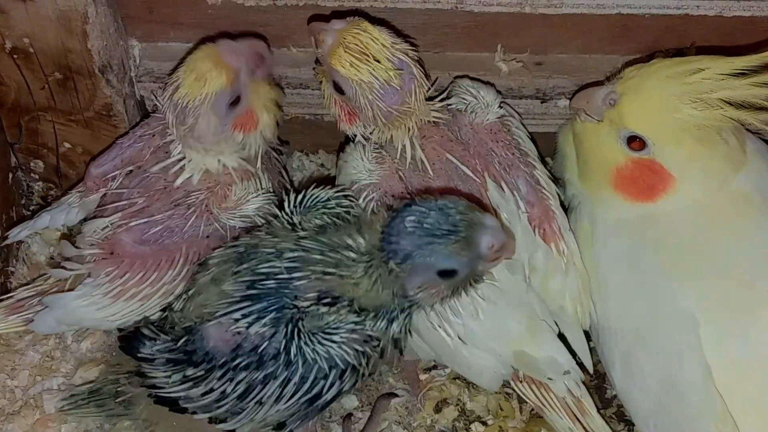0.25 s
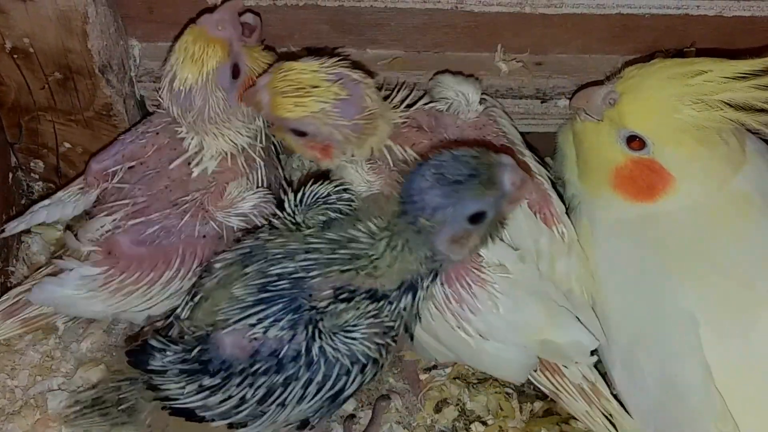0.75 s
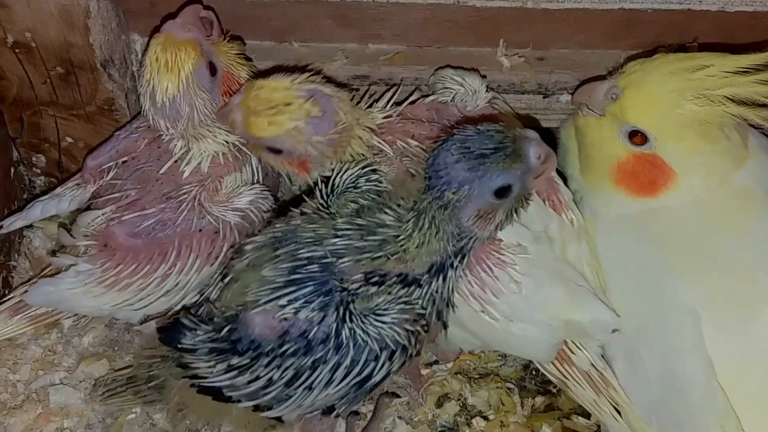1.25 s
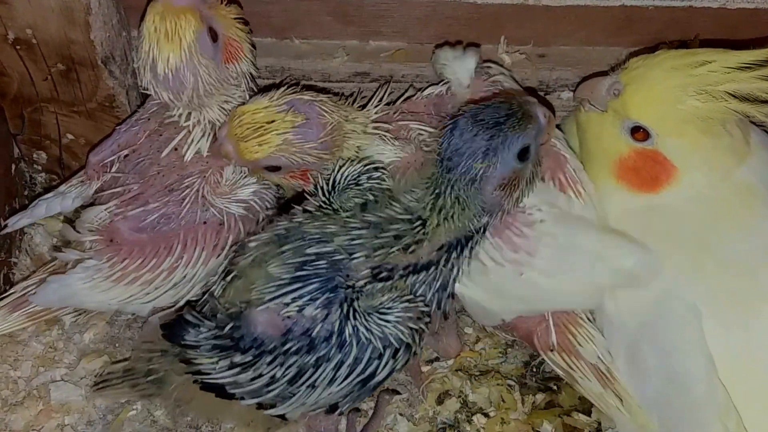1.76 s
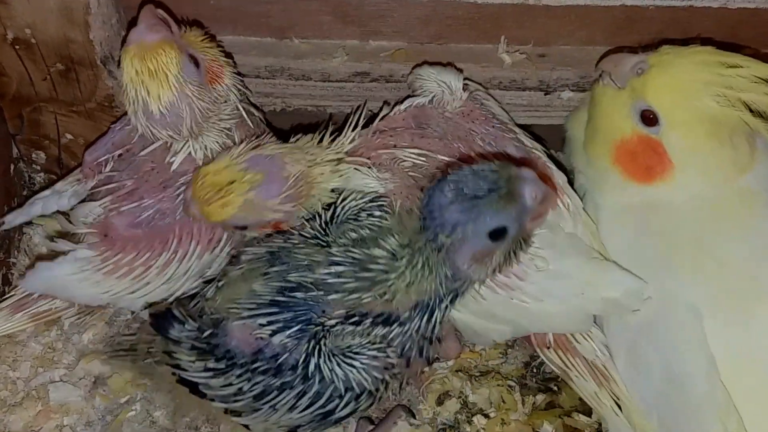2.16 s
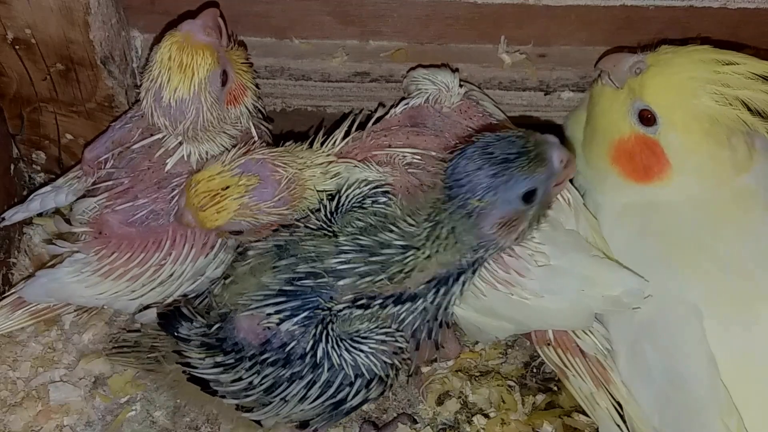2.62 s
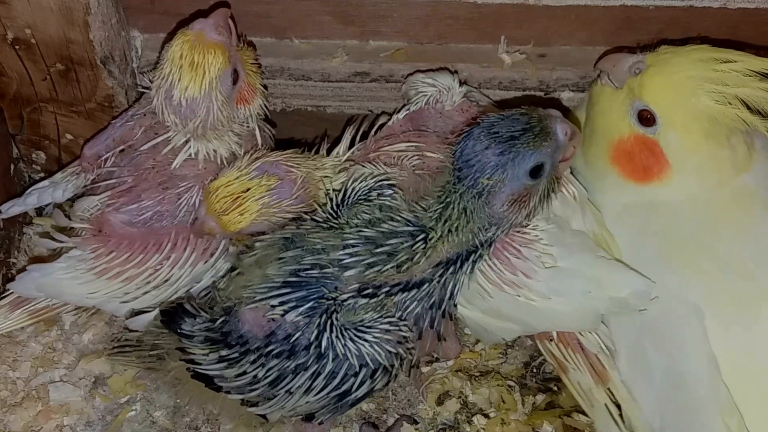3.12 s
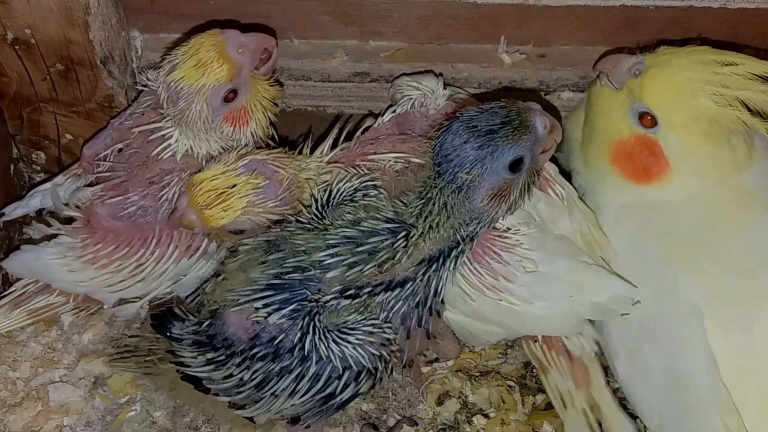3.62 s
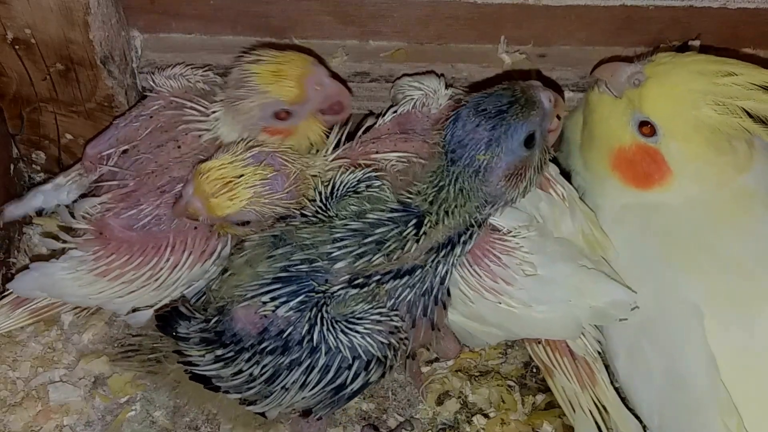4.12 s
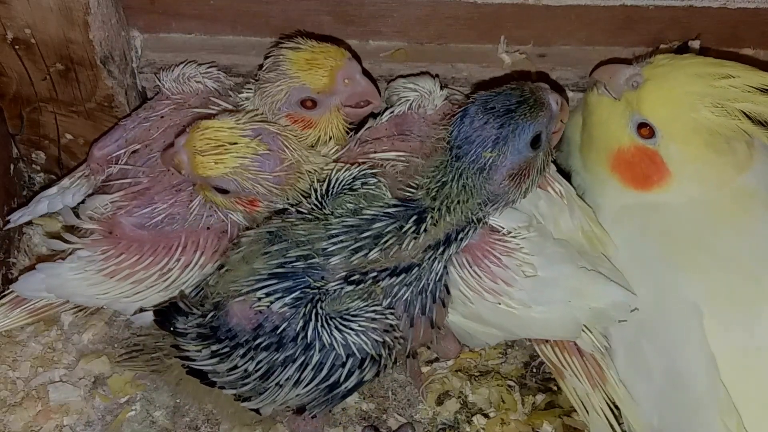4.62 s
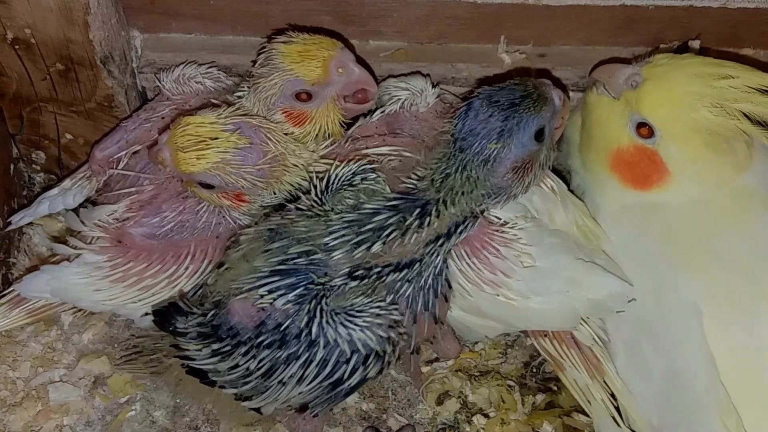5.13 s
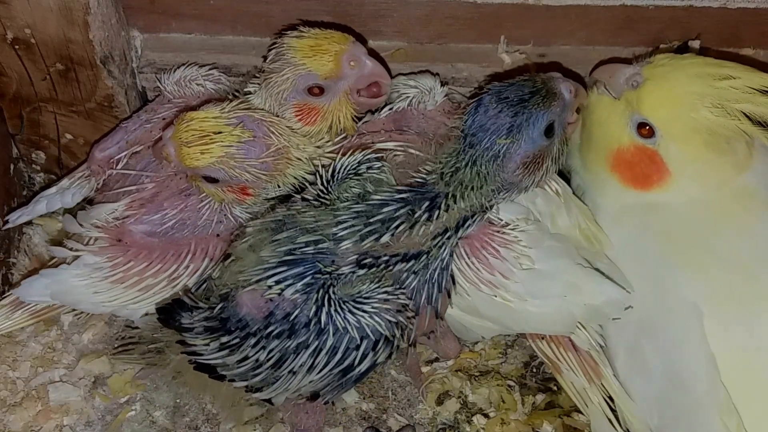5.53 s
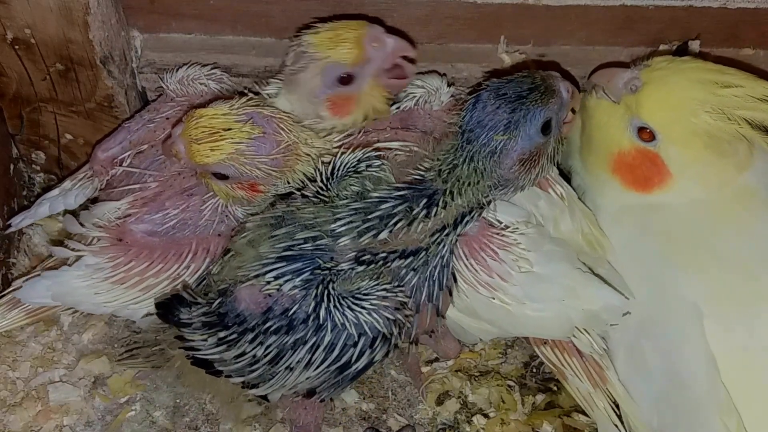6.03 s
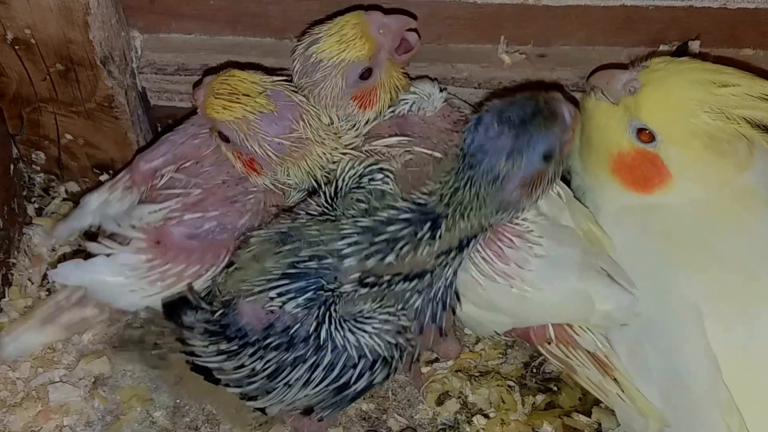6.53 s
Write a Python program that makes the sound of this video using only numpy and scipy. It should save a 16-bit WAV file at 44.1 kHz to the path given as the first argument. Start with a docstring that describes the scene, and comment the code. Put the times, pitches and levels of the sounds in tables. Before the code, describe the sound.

Cockatiel chicks beg in a wooden nest box, miked closely, with a tight brief echo and a faint steady room murmur. From 0.1 seconds, croaks and sputtering rasps break out with cracking squeals and a thin falling whistle, until about 1.2; low thuds hit the boards near 0.9 and 1.1. After a short lull, a stronger bout starts at 1.46: whistles, bright pips around 1.6 to 1.7, then long rasps and airy hisses to 2.2. A soft knock at 2.3 precedes a sharp rising peep at 2.5, squeals, hiss and a trembling whistle until 3.3. Rasps and croaks return at 3.4, with piercing squeals near 4.0 and a whistle sinking to 4.5. From 4.6, rasping and swelling hiss lead into squeals at 5.05 to 5.4, then wavering whistles. A bump at 5.95 opens another hissing, rasping, squealing bout; a knock and rising whistle finish 6.5 to 6.8.

```python
"""Cockatiel chicks beg in a wooden nest box, close to the microphone.
Their calls are ragged pulse trains: rasps ring the throat resonances, hisses those of the open beak.
Croaks are single hard slaps of the syrinx. Thin gliding whistles, cracking squeals, pure pips and
slurred peeps are swept tones with overtones. Filtered-noise bumps on the wood and a quiet room complete it."""
import sys
import numpy as np
from scipy import signal
from scipy.fft import rfft, irfft
from scipy.io import wavfile

SR = 44100
rng = np.random.default_rng(int(sys.argv[2]) if len(sys.argv) > 2 else 0)


def materialize(psi):
    """Save the field psi as 16-bit PCM at rate SR to the path in sys.argv[1].

    A 1-D psi becomes a single channel; in a 2-D psi each row is a channel.
    """
    bounded = np.clip(np.atleast_2d(psi).T, -1, 1)
    quanta = np.round(bounded * 32767).astype(np.int16)
    wavfile.write(sys.argv[1], SR, quanta)


N = 298557
TIME = np.arange(N) / SR

# throat and box resonances under rasps and croaks: (centre [Hz], width [Hz], relative level [dB])
THROAT_MODES = [(759, 45.7, -2), (1013, 68, -4), (1276, 44, -8), (1455.3, 56.3, 3), (1830, 145, -10),
                (1986, 36, -6), (2688, 150, -13.5), (3007, 84, -11), (3720, 110, -16), (4310, 140, -18.5),
                (5260, 380, -26.5), (6540, 270, -28.5), (9860, 790, -39)]


def amp(db):
    """Decibels to gain."""
    return 10 ** (np.asarray(db) / 20)


def unit(x):
    """Scales to rms 1."""
    return x / np.sqrt(np.mean(x ** 2) + 1e-20)


def add(mix, start_s, sound):
    """Mixes a sound in at start_s."""
    part = mix[max(round(start_s * SR), 0):][:len(sound)]
    part += sound[:len(part)]


def wander(rate_hz):
    """Smooth random signal of rms 1: noise rolled off above rate_hz."""
    hz = np.fft.rfftfreq(N, 1 / SR)
    rolloff = np.sqrt(1 + (hz / rate_hz) ** 6)
    return unit(irfft(rfft(rng.standard_normal(N)) / rolloff, N))


def play(start_s, length_s, db, swell_db, attack_s, release_s):
    """One call: its sample indices, its progress 0 to 1, and a loudness that rises, swells or sags, and stops."""
    after_start = TIME > start_s - attack_s / 2
    before_end = TIME < start_s + length_s + release_s / 2
    at = np.flatnonzero(after_start & before_end)
    t = TIME[at] - start_s
    u = np.clip(t / length_s, 0, 1)
    gate = np.clip(np.minimum(t / attack_s, (length_s - t) / release_s) + .5, 0, 1)
    return at, u, np.sin(np.pi / 2 * gate) ** 2 * amp(db + swell_db * (u - .5))


def effort(calls, attack_s, release_s):
    """Loudness of a run of calls over the whole scene."""
    out = np.zeros(N)
    for call in calls:
        at, _, loudness = play(*call, attack_s, release_s)
        out[at] += loudness
    return out


def ring(x, modes, size=4096):
    """Minimum-phase filter with these resonances and dark valleys between them."""
    hz = np.fft.fftfreq(size, 1 / SR)
    power = sum(amp(db) ** 2 / (1 + ((abs(hz) - f) / width) ** 2) ** 1.6 for f, width, db in modes)
    log_gain = np.log(power + 1e-10) / 2
    taps = np.fft.ifft(np.exp(np.conj(signal.hilbert(log_gain)))).real
    return signal.oaconvolve(x, taps[:size // 2])[:N]


def build_up(x):
    """The box takes a few milliseconds to answer a slap: all-passes delay each band, its level unchanged."""
    # (centre [Hz], width [Hz])
    late_bands = [(800, 450), (1460, 420), (3000, 1000), (4400, 1200)]
    for hz, width in late_bands:
        x = x - 2 * signal.lfilter(*signal.iirpeak(hz, hz / width, fs=SR), x)
    return x


def rattle(rate_hz, jitter, spread_db, puff_s, air):
    """Uneven slaps of the syrinx, each followed by a short decaying puff of turbulent air."""
    turns = np.cumsum(rate_hz * np.exp(jitter * wander(rate_hz))) / SR
    slaps = np.diff(np.floor(turns), prepend=0) * amp(spread_db * rng.uniform(-1, 1, N))
    flow = signal.lfilter([1], [1, -np.exp(-1 / (puff_s * SR))], slaps)
    turbulence = unit(flow * rng.standard_normal(N))
    return unit(unit(slaps) + air * turbulence)


def shrill(hz, octave_db):
    """High sine of rms 1 with faint overtones."""
    phase = 2 * np.pi * np.cumsum(hz) / SR
    octave = amp(octave_db) / (1 + (hz / 3500) ** 12)  # the beak passes little above 7 kHz
    overtones = (octave + amp(-35.5)) * np.sin(2 * phase) + amp(-40.5) * np.sin(3 * phase)
    return np.sqrt(2) * (np.sin(phase) + overtones)


def squeaks(hz, spread):
    """Chance scraps of tone, a few milliseconds each, scattered about hz."""
    catch = np.clip(wander(rate_hz=55) - .7, 0, 1)
    return unit(catch * shrill(hz * np.exp(spread * wander(rate_hz=35)), octave_db=-24))


def rasps():
    """The rattle rings the throat in sputtering bursts, evener when pushed, and chokes off in brief catches."""
    # (start [s], length [s], relative level [dB], lowest throat resonance against the rest [dB])
    rasp_calls = [(0.203, 0.057, -44, -7.5), (0.292, 0.152, -45.5, 1), (.456, 0.032, -45, -1),
                  (0.511, 0.042, -43, -5), (0.568, 0.026, -48, 2.5), (0.644, 0.12, -46.5, -5),
                  (0.778, 0.084, -45.5, -5), (0.886, 0.05, -44.5, 2), (0.95, 0.064, -44.5, 2),
                  (1.028, 0.13, -46, 8), (1.472, .018, -48, -12), (1.516, .033, -46.5, -7),
                  (1.57, 0.12, -44.5, -2.5), (1.708, 0.17, -45.5, 4), (1.886, 0.22, -45.5, 8),
                  (2.099, 0.068, -47.5, -2.5), (2.65, 0.089, -56.5, -2.5), (2.737, 0.34, -71, 19),
                  (3.443, 0.032, -47, -1), (3.51, 0.07, -44.5, -1.5), (3.606, 0.07, -46.5, 3.5),
                  (3.68, 0.22, -46.5, 5.5), (3.866, 0.059, -49.5, 0), (4.008, 0.029, -47, -11),
                  (4.05, 0.038, -50.5, -31), (4.645, 0.035, -46, -8), (4.693, 0.08, -46.5, -4),
                  (4.776, 0.024, -45.5, 2), (4.808, 0.24, -47.5, 0), (5.06, 0.036, -57, 4.5),
                  (5.106, 0.063, -50.5, -1), (5.172, 0.18, -50, -2), (5.592, 0.075, -53.5, -14),
                  (5.843, 0.038, -53, -8), (5.897, .07, -49.5, -6), (5.981, 0.16, -49.5, 5.5),
                  (6.141, 0.32, -48, 5), (6.443, 0.06, -51.5, 2)]
    # catches that choke a rasp: (centre [s])
    catch_times = [.234, 0.477, 0.702, .735, 1.607, 1.626, 1.795, 2.137, 3.566, 4.893, 4.917, 6.279, 6.405]
    catch_s, catch_depth = 0.01, 0.89
    sag_db = 1.5
    start, length, level_db, depth_db = np.transpose(rasp_calls)
    calls = [(s, span, db, -sag_db) for s, span, db in zip(start, length, level_db)]
    push = effort(calls, attack_s=.003, release_s=.012)
    depth = amp(np.interp(TIME, start + length / 2, depth_db))
    sputter_db = 8.5 * np.clip(1 - push / amp(-39), .42, 1)
    bursts = amp(sputter_db * (np.tanh(2 * wander(rate_hz=130) + .5) - .6))

    choke = np.zeros(N)
    for s in catch_times:
        add(choke, s - catch_s / 2, np.hanning(round(catch_s * SR)))
    push = push * np.clip(1 - catch_depth * choke, 0, 1)

    drive = push * bursts * rattle(rate_hz=230, jitter=.35, spread_db=3, puff_s=.0012, air=.35)
    noise_gain = np.std(ring(rng.standard_normal(N), THROAT_MODES))
    voice = build_up(ring(drive, THROAT_MODES)) / noise_gain
    low = signal.sosfiltfilt(signal.butter(3, 1120, fs=SR, output="sos"), voice)
    voice = voice + low * (depth - 1)
    return amp(.4) * voice + amp(-13) * push * squeaks(hz=3030, spread=.04)


def croaks():
    """One hard slap of the syrinx: the main throat resonance swells and dies within some cycles."""
    # alone or inside a rasp: (start [s], level [dB])
    slaps = [(0.106, -36), (0.156, -41), (0.22, -39), (.303, -42), (0.388, -33), (.479, -35.5), (.515, -37),
             (.961, -35), (1.036, -36.5), (1.465, -37), (1.717, -46), (3.606, -39), (3.685, -38),
             (3.75, -35), (3.869, -35.5), (3.897, -47), (4.546, -52), (4.795, -42.5), (4.854, -42),
             (4.877, -40), (4.98, -45), (5.16, -42), (6.551, -41.5), (6.651, -47)]
    tone_hz, rise_s, noise = 1500, 0.0015, 0.89
    out, t = np.zeros(N), np.arange(SR // 50) / SR
    swell = t / rise_s * np.exp(1 - t / rise_s)
    tone = np.sin(2 * np.pi * tone_hz * t)
    air = unit(ring(rng.standard_normal(N), THROAT_MODES))
    for s, db in slaps:
        puff = unit(air[round(s * SR):][:len(t)])
        add(out, s, amp(db) * swell * (tone + noise * puff) / (1 + noise))
    return out


def hisses():
    """A faster, airier rattle through the open beak, brighter the wider it gapes, with faint squeaks."""
    # (start [s], length [s], relative level [dB], swell start to end [dB], treble gain [dB])
    hiss_calls = [(0.707, 0.15, -53.5, 0, -6), (0.947, 0.25, -57, -2.5, 1.5), (1.54, 0.046, -63, 7, 18),
                  (1.949, 0.23, -53, 5, 0), (2.623, .17, -52, -2, 2), (2.818, 0.25, -50, 5.5, 4),
                  (3.722, 0.22, -59.5, -7, 2.5), (4.003, 0.091, -48, 8, -18), (4.702, 0.375, -49, 12, 0),
                  (5.079, 0.28, -53, 4, -4.5), (5.954, 0.31, -46.5, -1, -4), (6.258, 0.28, -52.5, 4, -16)]
    # open-beak resonances: (centre [Hz], width [Hz], relative level [dB])
    beak_modes = [(2137, 100, -4.5), (2520, 58, -0.5), (2870, 41, -4.5), (3130, 56, 1), (3355, 95, 4.5),
                  (3510, 70, -7), (3730, 67, 0.5), (4100, 95, 0), (4406, 61, -0.5), (4780, 66, -1.5),
                  (5030, 50, -2.5), (5370, 130, -6), (5830, 107, -7), (6090, 50, -14), (6520, 100, -13),
                  (9070, 56, -17), (10400, 1000, -28.5)]
    edge_s = 0.021
    start, _, _, _, treble_db = np.transpose(hiss_calls)
    bursts = amp(3.2 * np.tanh(1.5 * wander(rate_hz=90)))
    drive = rattle(rate_hz=300, jitter=.3, spread_db=4, puff_s=.0015, air=.6) * bursts
    breath = unit(build_up(ring(drive, beak_modes)))
    sound = amp(-.6) * breath + amp(-8.5) * squeaks(hz=3700, spread=.12)
    treble = signal.sosfiltfilt(signal.butter(4, 4300, "highpass", fs=SR, output="sos"), sound)
    latest = np.maximum(np.searchsorted(start, TIME) - 1, 0)
    gape = amp(treble_db[latest])
    return effort([row[:4] for row in hiss_calls], edge_s, edge_s) * (sound + treble * (gape - 1))


def whistles():
    """Gliding notes that overshoot, settle and tremble, clean unless hoarse; the overtones follow the octave."""
    # (start [s], length [s], pitch [Hz], glide [Hz/s], relative level [dB], swell [dB],
    #  octave against the note [dB])
    notes = [(0.225, 0.063, 2617, -500, -45.5, -21, -13), (0.333, 0.17, 2760, -300, -59.5, 9, -7.5),
             (0.485, 0.26, 2703, -350, -54.5, 11, -10.5), (0.708, 0.23, 2647, 646, -52, -15, -21),
             (1.463, 0.13, 2620, 900, -42.5, -3, -21), (1.604, 0.24, 2774, -930, -49.5, -2, -11),
             (1.823, 0.34, 2722, -360, -51, -3, -14), (2.617, 0.24, 2643, 716, -46.5, -13.5, -24),
             (2.846, .475, 2814, -400, -46.5, 1.5, -3.5), (4.548, 0.034, 2843, 7000, -63.5, -13, -17),
             (3.704, 0.025, 2874, 1500, -51, -1, -9), (3.717, 0.19, 2600, 100, -42.5, -7, -30),
             (3.908, 0.027, 2876, 1200, -48, 9, -10), (3.935, 0.088, 2810, -300, -50, 7, -7),
             (4.015, 0.46, 2728, -470, -47.5, -4.5, -8.5), (5.301, 0.157, 2605, 74, -45, -12.5, -21),
             (5.447, 0.023, 2765, 0, -53, 5, -11), (5.472, 0.08, 2884, -650, -47.5, 12.5, -11.5),
             (5.557, 0.047, 2897, 1298, -47, 8, -16.5), (5.6, 0.089, 2764, 3, -48, 2, -13),
             (5.679, 0.29, 2826, -250, -48.5, 6.5, -6.5), (6.522, 0.18, 2603, -2, -44, -9.5, -24.5),
             (6.696, 0.1, 2840, 1150, -44.5, 12, -7.5)]
    # hoarse stretches at the break between registers: (start [s], end [s])
    hoarse_spans = [(5.445, 5.472), (5.604, 5.668), (6.682, 6.7)]
    # a note starts too far from the register break, then settles; sharper is louder and brighter
    break_hz, overshoot_ratio, settle_s = 2751, 0.445, 0.0324
    louder_db_per_hz, brighter_db_per_hz = 0.1992, 0.0806
    # pitch and loudness tremble together, per unit of tremor
    tremor_hz, tremor_depth, tremor_db = 23.55, 0.0079, 1.0
    out = np.zeros(N)
    hoarse = sum((TIME > start) & (TIME < end) for start, end in hoarse_spans)
    tremor_phase = 2 * np.pi * np.cumsum(tremor_hz * np.exp(.3 * wander(rate_hz=15))) / SR
    tremor = np.sin(tremor_phase) + .5 * wander(rate_hz=38)
    quiver = 1 + tremor_depth * tremor + (.0015 + .042 * hoarse) * wander(rate_hz=260)
    flutter = amp(tremor_db * tremor)
    octave_flutter = amp(1.8 * wander(rate_hz=25))
    for start, length, hz, glide, db, swell_db, octave_db in notes:
        at, u, loudness = play(start, length, db, swell_db, attack_s=0.0086, release_s=0.0069)
        overshoot = overshoot_ratio * (hz - break_hz) * np.exp(-u * length / settle_s)
        bend = overshoot + glide * length * (u - .5)
        phase = 2 * np.pi * np.cumsum((hz + bend) * quiver[at]) / SR
        overtones = np.sin(2 * phase) + amp(-32.5) * np.sin(3 * phase) + amp(-36) * np.sin(4 * phase)
        octave = amp(octave_db + brighter_db_per_hz * bend) * octave_flutter[at]
        tone = flutter[at] * np.sin(phase) + octave * overtones
        out[at] += np.sqrt(2) * loudness * amp(louder_db_per_hz * overshoot) * tone
    return out


def arching_notes(calls, wobble, rough, crack_db, octave_db):
    """High arching notes that crack: the pitch leaps up as the tone thins, more so the higher the note."""
    out = np.zeros(N)
    strain, grain = wander(rate_hz=85), wander(rate_hz=600)
    cracks = unit(amp(crack_db * np.tanh(wander(rate_hz=400) - strain)))
    for start, length, first_hz, last_hz, arch_hz, db, swell_db in calls:
        at, u, loudness = play(start, length, db, swell_db, attack_s=.004, release_s=.004)
        hz = first_hz + (last_hz - first_hz) * u + arch_hz * np.sin(np.pi * u)
        leap = wobble * (hz / 4000) ** 4 * (np.logaddexp(0, 2 * strain[at]) - .5)
        bend = 1 + leap + rough * grain[at]
        out[at] += loudness * cracks[at] * shrill(hz * bend, octave_db)
    return out


def squeals():
    """Strained notes: wide pitch leaps, rough grain and deep cracks."""
    # (start [s], length [s], first pitch [Hz], last pitch [Hz], mid-call arch [Hz],
    #  relative level [dB], swell [dB])
    squeal_calls = [(.396, 0.021, 3330, 3900, 0, -49, -4), (.426, 0.048, 4230, 4750, 96, -44.5, -3),
                    (.476, 0.038, 4420, 4080, 0, -43.5, -8), (.51, 0.028, 4100, 3650, 620, -42.5, -5),
                    (1.578, 0.042, 3250, 4250, 208, -43.5, -4), (1.718, .02, 4150, 4420, 277, -41.5, -6),
                    (1.96, .2, 3056, 3295, -71.5, -48.5, 5), (2.571, 0.02, 4280, 4000, -250, -44, -4),
                    (2.6, 0.013, 4260, 5030, 200, -45.5, -2), (2.615, 0.029, 4200, 4930, -200, -44.5, -14),
                    (2.64, 0.053, 4150, 3660, -150, -49, -8), (2.75, 0.087, 3750, 3590, 5, -48, 8),
                    (2.85, 0.11, 3900, 3970, -450, -52, 5), (3.749, 0.041, 3350, 4070, 424, -44, -9),
                    (3.802, 0.051, 4100, 4480, 348, -46.5, 7), (3.864, 0.032, 4350, 4300, 180, -48.5, -6),
                    (3.979, 0.037, 3970, 3710, 3, -36.5, 9), (4.02, 0.058, 3400, 4080, -100, -44.5, 13),
                    (5.052, 0.056, 3350, 3240, 280, -41.5, -2), (5.121, .044, 3610, 3220, 179, -43.5, -3),
                    (5.186, 0.077, 3615, 3560, 119.5, -42.5, 5), (5.26, .036, 3630, 3400, 324, -40, -2),
                    (5.296, 0.058, 3765, 3810, -92, -39, 0), (5.353, 0.066, 3980, 4330, -42, -51.5, -4),
                    (5.428, 0.02, 4000, 4100, 0, -46, -4), (5.972, .014, 4130, 3970, 0, -44, 0),
                    (6.12, 0.12, 3220, 3050, 1, -45, -3), (6.29, 0.13, 3094, 3180, -3.5, -45.5, 13.5),
                    (6.422, .1, 3173, 3000, 191.5, -43.5, 1)]
    return arching_notes(squeal_calls, wobble=.034, rough=.014, crack_db=5.5, octave_db=-32)


def pips(squeal):
    """The squeal locks onto a loud, pure, slightly rising note for a moment."""
    # (centre [s], level [dB], mid pitch [Hz], length [s])
    pure_notes = [(0.437, -38, 4320, .016), (0.451, -39, 4450, 0.012), (0.488, -38.5, 4260, .009),
                  (0.521, -36, 4350, 0.013), (1.583, -36, 3400, 0.0072), (1.606, -42, 4160, 0.014),
                  (1.625, -39, 4300, .008), (1.644, -37.5, 4220, 0.025), (1.67, -36.5, 4210, 0.023),
                  (1.693, -36, 4390, 0.022), (1.718, -34.5, 4320, 0.0071), (2.177, -42.5, 3400, .007),
                  (2.535, -34.5, 3410, .007), (2.652, -41, 3840, 0.0078), (3.988, -36.5, 3830, 0.017),
                  (4.005, -33.5, 4090, 0.0064), (4.09, -34, 4200, 0.014), (5.423, -32.5, 3890, 0.016),
                  (6.003, -36.5, 4190, 0.02), (6.261, -37.5, 3440, 0.012)]
    pure, held = np.zeros(N), np.zeros(N)
    for s, db, hz, length in pure_notes:
        u = np.linspace(-1, 1, round(length * SR))
        swell = signal.windows.tukey(len(u), .55)
        add(pure, s - length / 2, amp(db) * swell * shrill(hz * (1 + 0.023 * u), octave_db=-39))
        add(held, s - length / 2, swell)
    return pure + squeal * np.clip(1 - held, 0, 1)


def peeps():
    """Smooth slurred notes: slight pitch leaps and shallow cracks, with a stronger octave."""
    # (start [s], length [s], first pitch [Hz], last pitch [Hz], mid-call arch [Hz],
    #  relative level [dB], swell [dB])
    peep_calls = [(.118, 0.026, 2640, 2990, 58, -52.5, -6), (.162, 0.038, 2170, 2280, -30, -55, -12),
                  (.29, 0.061, 4620, 4640, 100, -60.5, -1), (.588, .026, 2940, 3040, 40, -56, -4),
                  (1.493, 0.028, 2850, 2950, 50, -49, -3), (2.519, .042, 2215, 3830, 643, -46.5, 7),
                  (3.075, 0.013, 4000, 4580, 0, -42.5, -2), (3.292, 0.075, 3670, 3090, 330, -49.5, -14),
                  (3.37, .068, 3130, 2580, 598, -56, 13), (4.096, .068, 4190, 4380, -220, -41.5, 10),
                  (4.632, 0.018, 2640, 4450, 2, -47, -10), (4.683, 0.015, 2820, 2830, 0, -49, 0),
                  (4.72, 0.023, 4920, 5000, -60, -47, -2), (5.444, 0.01, 4200, 5100, -100, -46, 4)]
    return arching_notes(peep_calls, wobble=.005, rough=.004, crack_db=1.5, octave_db=-19)


def bumps():
    """A dull thud of the boards, as decaying band-passed noise, with a scratch of claws on top."""
    # (start [s], relative level [dB], pitch [Hz], t60 [s], relative scratch level [dB])
    knocks = [(.64, -47, 243, 0.12, -51), (0.931, -26, 121, 0.034, -71), (1.035, -34, 260, 0.1, -50.5),
              (1.108, -26.5, 122, 0.025, -54.5), (1.26, -53, 237, 0.27, -66), (2.308, -37, 300, .028, -72),
              (4.833, -42.5, 115, .12, -70), (5.956, -30, 120, 0.044, -68),
              (6.553, -40.5, 720, 0.072, -45.5), (6.559, -32, 220, .12, -57)]
    scratch_t60_s = 0.045
    out, t = np.zeros(N), np.arange(SR // 3) / SR
    claws = signal.butter(1, [900, 6000], "bandpass", fs=SR, output="sos")
    for s, db, hz, t60, scratch_db in knocks:
        push, grit = rng.standard_normal((2, len(t)))
        boards = signal.butter(2, [hz * 0.9, hz * 1.19], "bandpass", fs=SR, output="sos")
        thud = unit(signal.sosfilt(boards, push)) * amp(db - 60 * t / t60)
        scratch = unit(signal.sosfilt(claws, grit)) * amp(scratch_db - 60 * t / scratch_t60_s)
        add(out, s, thud + scratch)
    return out


def box(x):
    """The close walls of the box add a very brief echo and a faint tail."""
    t = np.arange(SR // 6) / SR
    decay = amp(-60 * t / .025) + amp(-26 - 60 * t / .2)  # t60 25 ms and 200 ms
    tail = rng.standard_normal(len(t)) * decay * (t > .001)
    return x + amp(-17) * signal.oaconvolve(x, tail / np.linalg.norm(tail))[:N]


def room():
    """Low murmur and an even thin hiss: steady noise shaped by one spectrum."""
    # (frequency [Hz], relative density [dB per Hz])
    spectrum = [(25, -39), (45, -11.5), (90, -5.5), (135, 1.5), (200, -4.5), (400, -11), (800, -13.5),
                (2000, -15.5), (5000, -24.5), (8000, -32), (15500, -24.5)]
    level_db = -63.5
    hz = np.fft.rfftfreq(N, 1 / SR)
    f, db = np.transpose(spectrum)
    colour = amp(np.interp(np.log(hz + 1), np.log(f), db))
    return amp(level_db) * unit(irfft(rfft(rng.standard_normal(N)) * colour, N))


def scene():
    """All the chicks in their box, over the room."""
    chicks = rasps() + croaks() + hisses() + whistles() + pips(squeals()) + peeps()
    return (box(chicks + bumps()) + room())[None]


def record(dry):
    """The recorder's band limit: a linear-phase low-pass."""
    edge_hz = 15800
    taps = signal.firwin(511, edge_hz, window=("kaiser", 9), fs=SR)
    return signal.oaconvolve(dry, taps[None], "same")


dry = scene()
out = record(dry)
materialize(out)
```